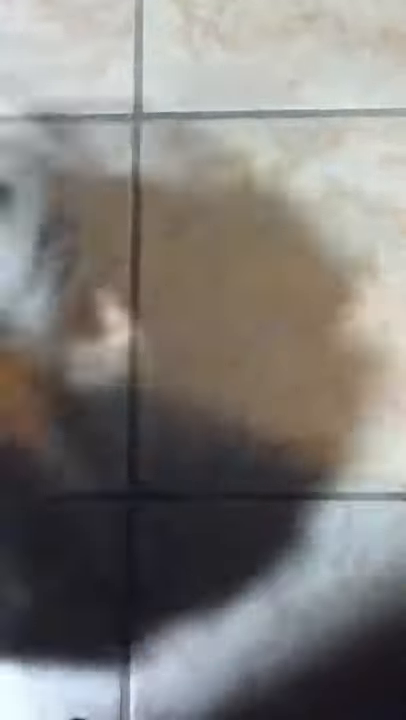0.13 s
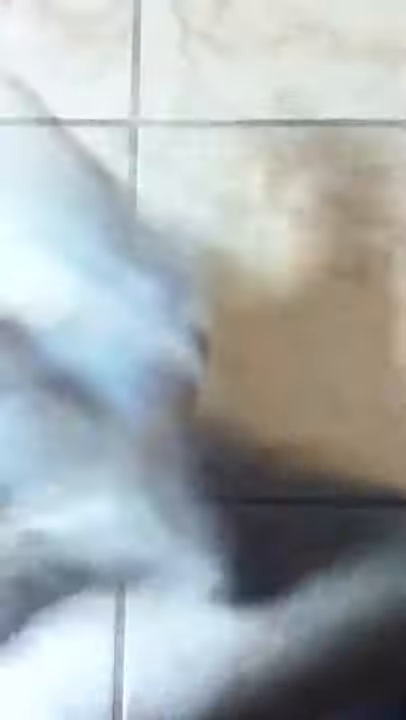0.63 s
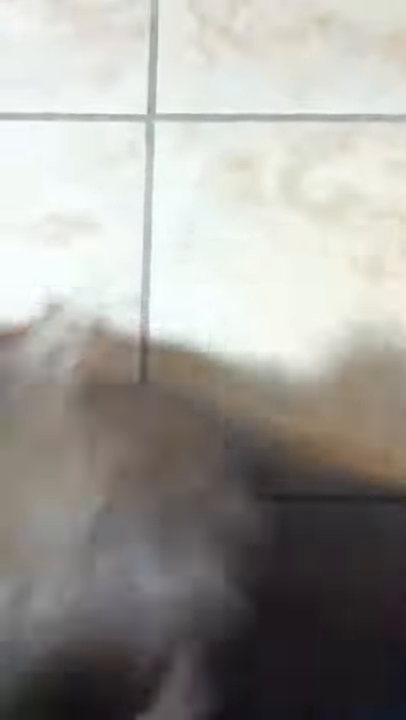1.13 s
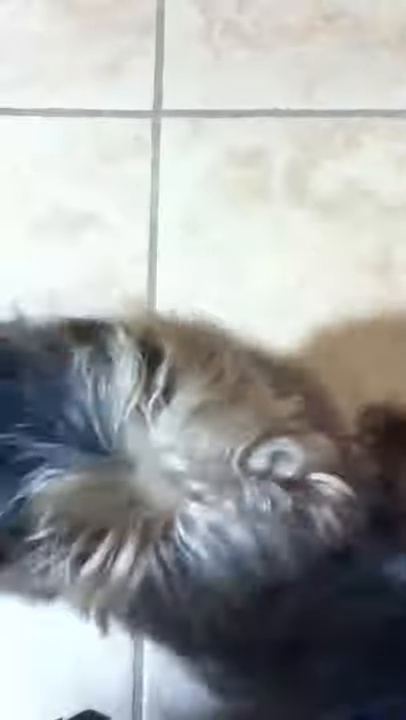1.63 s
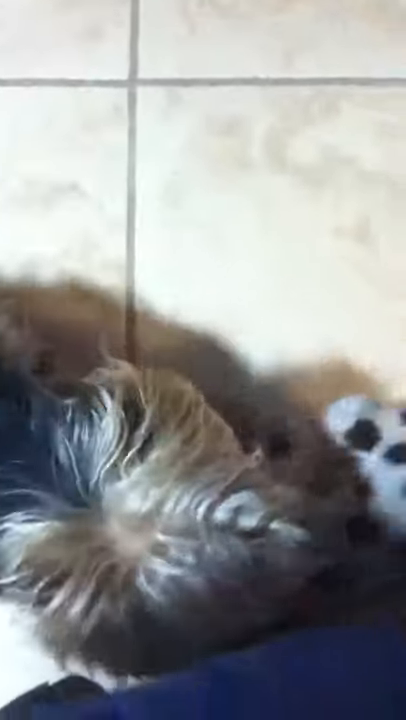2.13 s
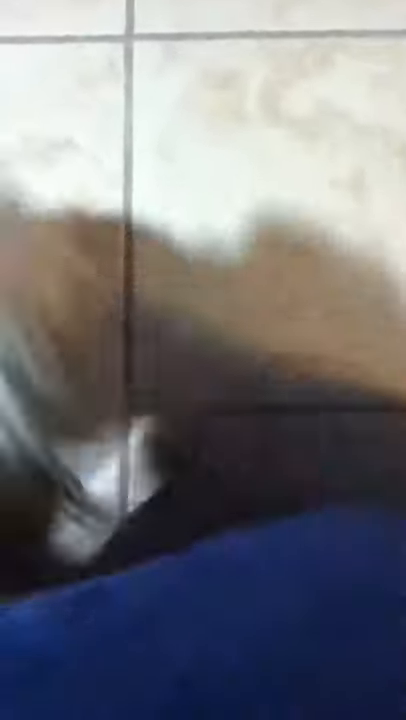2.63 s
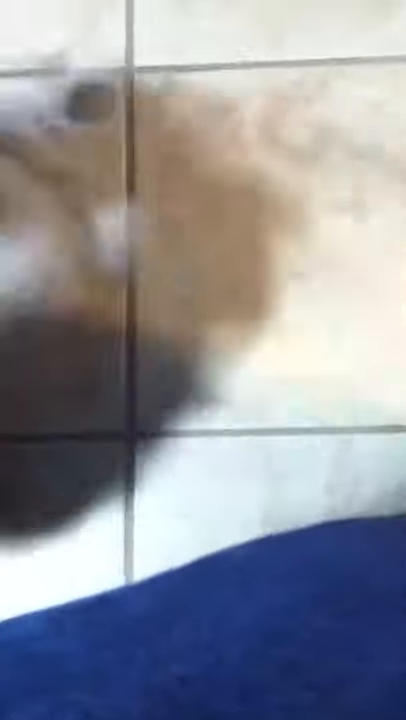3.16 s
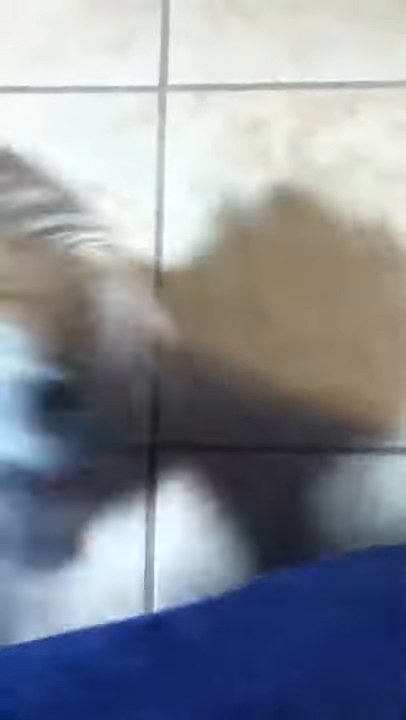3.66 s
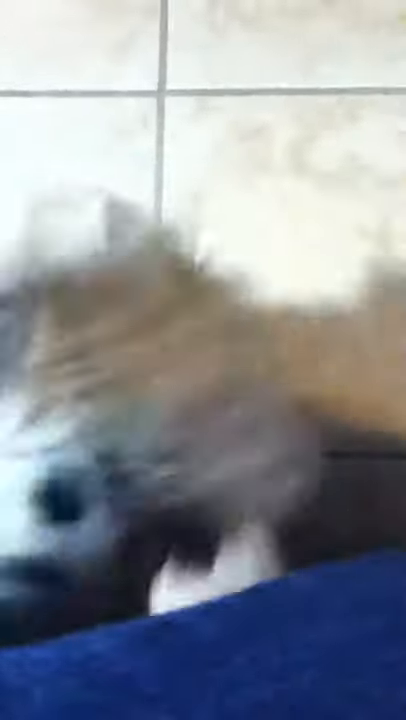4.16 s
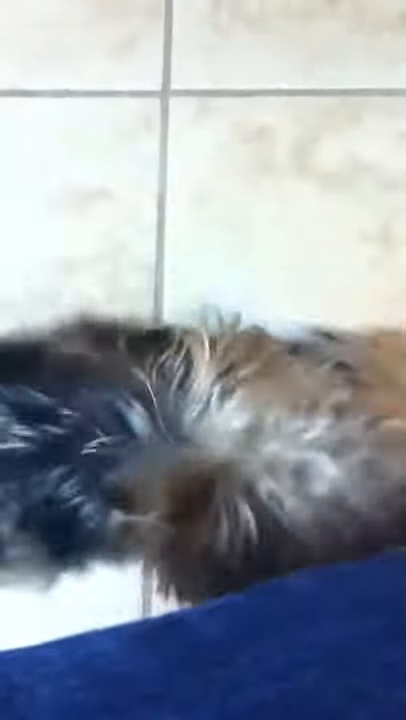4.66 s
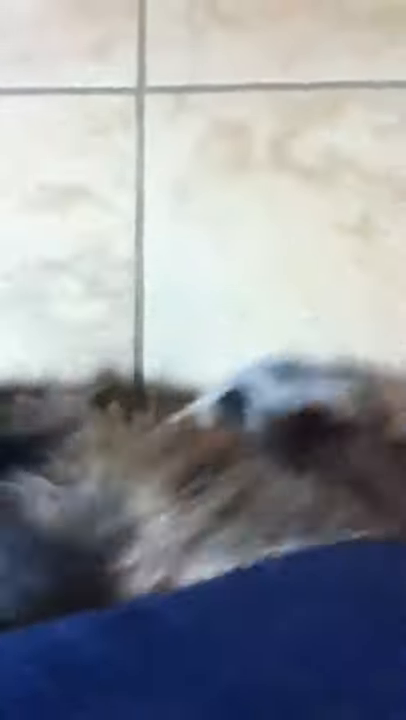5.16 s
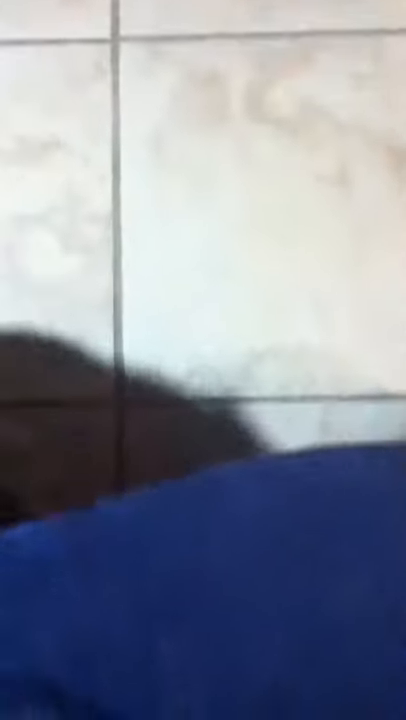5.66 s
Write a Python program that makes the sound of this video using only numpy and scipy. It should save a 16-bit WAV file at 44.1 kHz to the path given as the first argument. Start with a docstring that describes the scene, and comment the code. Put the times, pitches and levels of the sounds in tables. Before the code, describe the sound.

Close to a phone microphone in a hard, tiled room, a small dog growls roughly in play. Two loud raspy growls come first, the second with thin whistles, then a toy knocks and collar tags chink brightly. A low, quiet growl follows, then a longer one that starts low and swells. Claws and tags scatter over the tiles before three final growls, the last two softer. A faint household hum runs beneath.

```python
"""A small dog play-growls over a toy on a tiled floor, close to a phone, in a hard room with a household hum.
A faint tag chink and claw ticks lead into two rough growls, with thin whistles in the second; the toy knocks,
tags chink, and two growls that start low follow. Claws and tags fill the gap before three last growls.
Growls are irregular slaps through moving resonances, with breath noise gated by the slaps; tags and toy are
decaying partials, claws are noise bursts; the room is decaying noise and the hum is coloured noise."""
import sys
import numpy as np
from scipy import signal
from scipy.fft import rfft, irfft, next_fast_len
from scipy.io import wavfile
from scipy.ndimage import uniform_filter1d, map_coordinates

SR = 44100
rng = np.random.default_rng(int(sys.argv[2]) if len(sys.argv) > 2 else 0)


def convert_level_to_amplitude(level_db):
    """Map a level in decibels to its linear amplitude factor."""
    exponent = np.asarray(level_db, float) / 20
    return 10 ** exponent


def to_wav(s):
    """Save 16-bit WAV."""
    ch = np.atleast_2d(s).T  # columns
    pcm = np.round(np.clip(ch, -1, 1) * 32767)  # PCM
    wavfile.write(sys.argv[1], SR, pcm.astype(np.int16))


N = 255339

# Colour of hard things scraping, for claws and metal. Each row: frequency in Hz, relative level in dB.
SCRAPE_COLOUR = [(2500, -22), (4500, -5.5), (9000, -2), (13000, -7), (15000, -15), (15900, -70)]


def unit(x):
    """Scales a signal to rms 1."""
    return x / np.sqrt(np.mean(x ** 2) + 1e-20)


def along(points, hz):
    """Interpolates (Hz, value) points on a log frequency axis."""
    f, v = np.transpose(points)
    return np.interp(np.log(hz + 1), np.log(f + 1), v)


def filtered(x, response):
    """Passes x through a fixed complex response of frequency."""
    m = next_fast_len(len(x) + 8192)
    return irfft(rfft(x, m) * response(np.fft.rfftfreq(m, 1 / SR)), m)[:len(x)]


def resonances(modes, sign=-1):
    """Causal response of (Hz, width, dB) modes; sign 1 starts all together and leaves dark valleys."""
    def response(f):
        total = 0
        for k, (centre, width, db) in enumerate(modes):
            damping = 1j * f * width
            total = total + sign ** k * convert_level_to_amplitude(db) * damping / (centre * centre - f * f + damping)
        return total
    return response


def moving(x, response, size=512):
    """Passes x through a response of (frequency, sample position) that changes from frame to frame."""
    starts = np.arange(0, len(x) + size, size // 2)
    padded = np.pad(x, (size // 2, 2 * size))
    frames = padded[starts[:, None] + np.arange(size)] * signal.get_window("hann", size)
    hz = np.fft.rfftfreq(4 * size, 1 / SR)
    shapes = response(hz, np.minimum(starts, len(x) - 1)[:, None])
    out = irfft(rfft(frames, 4 * size) * shapes)
    at = starts[:, None] + np.arange(4 * size)
    return np.bincount(at.ravel(), out.ravel())[size // 2:][:len(x)]


def coloured(size, spectrum):
    """Noise of rms 1 with a (Hz, dB) spectrum."""
    return unit(filtered(rng.standard_normal(size), lambda hz: convert_level_to_amplitude(along(spectrum, hz))))


def wobble(size, rate):
    """A smooth random curve with rate knots a second."""
    knots = rng.standard_normal(int(size * 4 * rate / SR) + 9)
    return map_coordinates(knots, [np.arange(size) * rate / SR])


def impulses(size, at, sizes):
    """Band-limited impulses at fractional sample positions."""
    taps = np.floor(at)[:, None] + np.arange(-7, 9)
    offset = taps - at[:, None]
    shape = np.sinc(offset) * np.cos(np.pi * offset / 18) ** 2
    where = np.clip(taps, 0, size - 1).astype(int)
    return np.bincount(where.ravel(), (shape * sizes[:, None]).ravel(), size)


def steady(x, span):
    """Evens out the slow level of x over a span in seconds."""
    return x / np.sqrt(np.abs(uniform_filter1d(x ** 2, round(span * SR))) + 1e-12)


def dog():
    """Sets all the growls in place; each is one bout of fold slaps through a moving mouth."""
    # The folds, one table a bout. Each row: time in seconds, fold rate in Hz, chest level in dB.
    growls = [
        [(.284, 151.9, -53), (.318, 194.7, -40), (.34, 218.7, -29.5), (.39, 202, -37), (.428, 208.3, -32),
         (.464, 187, -48.5)],
        [(.566, 218.8, -38.5), (.585, 225, -31), (.632, 189.7, -33.5), (.69, 202.1, -29), (.76, 222.8, -31.5),
         (.82, 191.3, -39.5), (.856, 234.3, -42.5), (.9, 189.5, -38), (.94, 216, -40.5), (.974, 195, -32),
         (.995, 179.2, -51)],
        [(1.69, 125.4, -50), (1.738, 127.4, -45.5), (1.83, 131.2, -45), (1.88, 139.2, -45),
         (1.94, 142.6, -46.5), (1.98, 135.7, -43.5), (2.09, 137.6, -45.5), (2.148, 144.4, -42.5),
         (2.202, 114.4, -53.5)],
        [(2.5, 116.1, -52.5), (2.56, 122.9, -46.5), (2.602, 125.2, -40), (2.63, 148.8, -45),
         (2.664, 189.6, -30), (2.72, 197.9, -33.5), (2.76, 194.4, -36), (2.806, 220.5, -30),
         (2.874, 189.6, -34), (2.956, 213.5, -30), (3.006, 193.1, -37), (3.058, 222.6, -32.5),
         (3.124, 184.8, -41)],
        [(3.884, 114.2, -44), (3.94, 136.4, -45.5), (3.98, 133.3, -44), (4.028, 152.2, -45.5),
         (4.06, 203.1, -33), (4.134, 194.5, -32.5), (4.182, 178.8, -36), (4.222, 173.8, -47.5),
         (4.256, 199.4, -40), (4.29, 196.7, -37), (4.318, 186.8, -43.5), (4.382, 153.9, -41)],
        [(4.776, 128, -50), (4.814, 137.5, -44), (4.866, 149.3, -42.5), (4.91, 137.9, -47), (5.0, 135.9, -45),
         (5.05, 126, -45), (5.12, 142, -44), (5.148, 156.5, -40), (5.184, 237.7, -45.5), (5.242, 212.8, -43.5),
         (5.3, 195.6, -70)],
        [(5.574, 104.1, -50.5), (5.59, 105.1, -57), (5.612, 113.4, -43), (5.658, 123.6, -45.5),
         (5.718, 141, -48), (5.79, 145, -50)],
    ]
    # What leaves the mouth, one table a bout. Each row: time in seconds, rasp level in dB,
    # low resonance in Hz, share of the middle band in dB, share of the high band in dB.
    rasps = [
        [(0.284, -43.5, 950, -2, -6.5), (0.294, -35, 940, -2.5, -5.5), (0.332, -30, 930, -4, -4.5),
         (0.384, -34.5, 980, -3.5, -6), (0.414, -29.5, 1000, -1, -1.5), (0.438, -37, 1000, -7, -8),
         (0.458, -45, 990, -22, -15), (0.464, -46, 1010, -2, 2)],
        [(0.566, -35.5, 1080, -17, -24), (0.58, -34.5, 1080, -4.5, -11), (0.602, -40.5, 1050, -7, -17),
         (0.628, -38.5, 940, 0.5, -8), (0.672, -34, 1090, 0, -7), (0.71, -35.5, 950, -2.5, -9),
         (0.744, -28, 885, -1.5, -6.5), (0.81, -36.5, 940, -3.5, -14), (0.84, -44.5, 970, -23, -18),
         (0.87, -32, 1000, -10, -18), (0.896, -39, 1010, 0, -9.5), (0.956, -32.5, 1010, -3.5, -9),
         (0.995, -41, 1023, -3.5, -14.5)],
        [(1.7, -56, 1000, -16, -11), (1.776, -41, 1060, -3, -7.5), (1.836, -45, 1060, -4, -5.5),
         (1.85, -43.5, 1060, -6.5, -9), (2.026, -44, 1090, -1, -8.5), (2.034, -46, 1070, -7, -4),
         (2.066, -41.5, 1010, -2, -5), (2.074, -47, 1008, 2, -0.5), (2.108, -40.5, 1000, 0, -9),
         (2.122, -50, 1030, 2, 0), (2.146, -43, 1060, -4.5, -12.5), (2.2, -53, 967, -5, 0)],
        [(2.535, -70, 1010, -16, -24), (2.553, -41, 1010, -15, 0), (2.593, -40.5, 1010, -0.5, 1),
         (2.701, -33, 820, -2.5, -8.5), (2.779, -33.5, 885, -5, -8), (2.817, -37, 874, -11, -28),
         (2.917, -39, 880, -2.5, -7.5), (2.959, -31.5, 889.5, 0, -1), (3.011, -38, 949, -9, -18),
         (3.061, -28.5, 986, -4.5, -5.5), (3.124, -47.5, 920, -2, -15)],
        [(3.88, -47, 986, -9, -25), (3.954, -41, 1040, -3, -6), (3.982, -50, 1010, -1, -8),
         (3.99, -39.5, 1020, -4, -2), (4.066, -36.5, 950, 1.5, 0), (4.144, -37.5, 1000, -1.5, 2),
         (4.224, -46.5, 870, -7, -9), (4.28, -49, 940, -16, -17), (4.298, -41, 923, -16, -21),
         (4.304, -56, 910, -10, -12), (4.33, -48.5, 900, -10, -5), (4.37, -46.5, 980, -7, -9),
         (4.39, -45, 1030, -7, -8.5)],
        [(4.78, -51.5, 765, -9, -12), (4.822, -42, 774, -7.5, -12.5), (4.91, -40.5, 836, -7.5, -7),
         (4.936, -43.5, 840, -6, -14), (4.954, -47, 825, -14, -14), (5.02, -42.5, 790, -9, -11),
         (5.03, -47, 834, -10, -15), (5.058, -38, 870, -7, -11), (5.078, -44.5, 910, -7, -10),
         (5.088, -40, 820, -8.5, -8.5), (5.184, -46.5, 765, -7, -14), (5.258, -52, 840, -15, -6),
         (5.3, -59, 848, -7, 1)],
        [(5.59, -55, 830, -11, -23), (5.612, -48, 820, -7, -15), (5.628, -41.5, 840, -11, -11),
         (5.668, -44, 840, -10, -14), (5.68, -44, 820, -9, -16.5), (5.79, -42, 840, -8.5, -13.5)],
    ]
    # Unevenness, one row a bout: roughness from 0 to 1, flutter rate in Hz, time of a flutter trough
    # in seconds, flutter depth in dB when the folds are fully slack.
    roughs = [(.85, 24, .3, 2.5), (.85, 24, .6, 2.5), (.45, 23.8, 1.875, 2.6), (.65, 25, 2.6, 2),
              (.8, 25, 3.94, 2.6), (.5, 27, 4.95, 1.2), (.4, 25.6, 5.68, 1)]
    # Mean breath level of each bout in dB.
    breath_levels = [-52.5, -52.5, -68.5, -52.5, -61, -60, -61]
    # Moving resonances, one row a bout: usual low, middle and high levels in dB, top of the voice in Hz.
    jaws = [((-0.67, 0, -2), 2700), ((-0.21, 0, -4), 2500), ((-11.5, 0, -7.5), 2690), ((0, -1.5, -11),
            3090), ((1, 0, -9.5), 3200), ((0, -3.1, -3.5), 2980), ((0, -10, -10.5), 2980)]
    # Their widths, one row a bout: low, middle and high in Hz.
    jaw_widths = [(200, 260, 380), (180, 200, 340), (450, 115, 300), (190, 190, 320), (220, 180, 320),
                  (170, 140, 300), (170, 150, 300)]
    # Resonances of near-steady pitch, one table a bout. Each row: centre in Hz, width in Hz, usual level in dB.
    throats = [
        [(1210, 160, -19), (5050, 370, 2)],
        [(1160, 130, -17.5), (5150, 430, 6.5)],
        [(1300, 180, -11), (3400, 166, 4.5), (3930, 190, 5)],
        [(1230, 48, -14), (4380, 84, -11), (4700, 390, -15)],
        [(1190, 84, -9), (4150, 96, -6), (4650, 330, -15)],
        [(606, 120, -11.5), (2950, 45, -4), (3620, 330, -1), (4380, 400, -11)],
        [(524, 38, 1.5), (3530, 83, 2), (4580, 940, -1)],
    ]
    out = np.zeros(N + SR)
    for shape in zip(growls, rasps, roughs, breath_levels, jaws, jaw_widths, throats):
        voice, start = bout(*shape)
        out[round(start * SR):][:len(voice)] += voice
    return out[:N]


def bout(folds, rasp, rough, mean_breath_db, jaw, widths, still):
    """One growl: slaps boom in the chest, crack through the moving mouth and gate the breath noise."""
    s, *fold_tracks = np.transpose(folds)
    t = np.arange(s[0] - .07, s[-1] + .1, 1 / SR)
    n = len(t)
    pitch, chest_db = (np.interp(t, s, track) for track in fold_tracks)
    rasp_s, *rasp_tracks = np.transpose(rasp)
    throat_db, low_hz, middle_db, high_db = (np.interp(t, rasp_s, track) for track in rasp_tracks)
    # breath moves .45 dB per dB of voice, with 1.5 dB gusts of its own
    breath_db = mean_breath_db + .45 * (throat_db - np.median(throat_db)) + 1.5 * wobble(n, 21.1)

    even, slaps = fold_slaps(t, pitch, rough)
    # air leaks after each slap
    puffs = unit(np.abs(filtered(slaps, lambda f: 1 / (1 + 1j * f / 90) ** 2)))
    modes = mouth_modes(t, low_hz, middle_db, high_db, rough[0], jaw[0], widths, still)
    hollow = min(hz for hz, width, db in still) > 960  # Hz; no throat resonance lies in the nasal band
    throat = throat_rasp(slaps, puffs, modes, rough[0], jaw[1], hollow)

    before, after = np.maximum(s[0] - t, 0), np.maximum(t - s[-1], 0)

    def ends_db(rise_s, fall_s):
        """Fades by 30 dB in each of these times outside the bout."""
        return -30 * (before / rise_s + after / fall_s)

    mix = convert_level_to_amplitude(throat_db + ends_db(.026, .013)) * throat
    mix = mix - convert_level_to_amplitude(caught(t, chest_db) + ends_db(.059, .059)) * chest_boom(even)
    mix = mix + convert_level_to_amplitude(breath_db + ends_db(.045, .1)) * breath_hiss(puffs)
    edge = np.clip(np.minimum(t - t[0], t[-1] - t) / .012, 0, 1)
    return edge * mix, t[0]


def fold_slaps(t, pitch, rough):
    """Vocal folds slap once a cycle: an even train for the chest and an irregular one for the mouth."""
    # Single slaps given a level of their own. Each row: time in seconds, dB over the usual slap.
    cracks = [(0.294, 2.5), (.308, 4), (.336, 6.5), (0.411, -0.5), (.618, 6), (.739, 0), (1.884, 4),
              (2.9515, 3), (2.9613, 6), (3.0378, 6), (3.0593, 5.5), (3.072, 5), (3.993, 2), (4.032, 4.5),
              (4.289, -3), (4.809, 2), (5.042, 4), (5.612, 8)]
    roughness, flutter_hz, trough, flutter_db = rough
    n = len(t)
    # slack folds at low pitch beat against loose tissue
    slack = np.clip((175 - pitch) / 30, .25, 1)
    flutter = -slack * np.cos(2 * np.pi * flutter_hz * (t - trough) + .3 * wobble(n, 8))
    calm = 1 - .4 * slack  # slack folds lose part of the roughness
    rate = pitch * (1 + .025 * flutter + .04 * roughness * calm * wobble(n, 40))
    cycles = np.cumsum(rate) / SR
    at = np.interp(np.arange(1, cycles[-1]), cycles, np.arange(n))
    k = at.astype(int)
    period = SR / pitch[k]  # samples
    chance = np.clip(rng.standard_normal((len(at), 6)), -2, 2)

    even_at = at + (.035 + .025 * slack[k]) * chance[:, 3] * period
    even = impulses(n, even_at, convert_level_to_amplitude(flutter_db * flutter[k] + 2.0 * chance[:, 0]))

    scatter_db = .8 + 2.2 * roughness
    size = convert_level_to_amplitude(flutter_db * flutter[k] + scatter_db * chance[:, 1])
    uneven = at + .05 * roughness * calm[k] * chance[:, 2] * period
    for moment, db in cracks:
        if t[0] < moment < t[-1]:
            position = (moment - t[0]) * SR
            nearest = np.argmin(np.abs(at - position))
            uneven[nearest], size[nearest] = position, convert_level_to_amplitude(db)
    slaps = impulses(n, uneven, size)

    # some slaps rebound .45 of a cycle later, 3 dB weaker; at full roughness .22 of them do
    rebounds = chance[:, 4] > np.quantile(chance[:, 4], 1 - .22 * roughness)
    slaps = slaps + impulses(n, at + .45 * period, rebounds * size * convert_level_to_amplitude(-3))

    # each slap is a little brighter or duller above 900 Hz
    tint = convert_level_to_amplitude(3 * chance[:, 5])
    brighter = impulses(n, uneven, size * (tint - 1))
    return even, slaps + filtered(brighter, lambda f: (1j * f / 900 / (1 + 1j * f / 900)) ** 2)


def mouth_modes(t, low_hz, middle_db, high_db, roughness, levels, widths, still):
    """Jaws and tongue move three resonances; with roughness all waver as the tongue stirs."""
    # Jaws and tongue at work on the toy. Each row: time in seconds, middle resonance in Hz, high one in Hz.
    mouth = [(.27, 1810, 2950), (.45, 1690, 2690), (.56, 1680, 2740), (.65, 1780, 2700), (.74, 1600, 2950),
             (.8, 1450, 2930), (.86, 1510, 2850), (.93, 1880, 2760), (1.02, 1652, 2760), (1.68, 1770, 2330),
             (1.76, 1915, 2350), (2.2, 1860, 2580), (2.54, 2180, 3730), (2.59, 2060, 3440),
             (2.64, 1700, 2950), (2.71, 1670, 2940), (2.85, 1450, 3240), (2.96, 1570, 2950),
             (3.06, 1550, 3400), (3.16, 1580, 3400), (3.87, 1758, 3160), (4.0, 1880, 3400),
             (4.1, 1790, 2770), (4.2, 1660, 2950), (4.29, 1300, 2950), (4.33, 1890, 3200),
             (4.37, 2010, 3300), (4.42, 2454, 3300), (4.78, 1390, 2380), (4.86, 1350, 1980),
             (4.95, 1430, 1580), (5.0, 1260, 2040), (5.2, 1360, 2270), (5.3, 1300, 2900),
             (5.58, 1400, 2300), (5.79, 1500, 1730)]
    wander, flicker_db, chews_per_s = .045, 5, 30  # share of pitch and dB, both at full roughness
    n = len(t)
    when, *tracks = np.transpose(mouth)
    middle_hz, high_hz = (np.interp(t, when, hz) for hz in tracks)
    # a resonance gains 1.58 dB per dB of its band's share
    middle_db, high_db = (1.58 * np.clip(db - np.median(db), -9, 7) for db in (middle_db, high_db))
    levels = [levels[0], levels[1] + middle_db, levels[2] + high_db]
    modes = [*zip([low_hz, middle_hz, high_hz], widths, levels)]
    # throat resonances above 1700 Hz brighten and dull with the high one
    modes += [(hz, width, db + high_db * (hz > 1700)) for hz, width, db in still]
    wavering = []
    for hz, width, db in modes:
        centre = np.broadcast_to(hz, n) * (1 + roughness * wander * wobble(n, chews_per_s))
        wavering.append((centre, width, db + roughness * flicker_db * wobble(n, chews_per_s)))
    return wavering


def throat_rasp(slaps, puffs, modes, roughness, top_hz, hollow):
    """Slaps and leaking air crack through the nose and the moving mouth resonances."""
    # (Hz, width Hz, dB): the bare slap heard past the resonances, then the nose
    snap, nose = (1700, 4800, -13), (380, 270, -16)
    share = .06 + .07 * roughness  # noise power
    noise = unit((puffs + 2.1) * rng.standard_normal(len(slaps)))
    source = np.sqrt(1 - share) * unit(slaps) + np.sqrt(share) * noise
    source = filtered(source, lambda f: (1 - (f / top_hz) ** 2 + 1.3j * f / top_hz) ** -3)
    if hollow:
        # the nasal passage swallows .6 of a band at 610 Hz, 260 Hz wide
        source = filtered(source, lambda f: 1 - .6 * resonances([(610, 260, 0)])(f))

    def tract(f, i):
        now = [(hz[i], width, db[i]) for hz, width, db in modes]
        return resonances([snap, nose] + now, sign=1)(f)

    return steady(moving(source, tract), span=.049)


def caught(t, chest_db):
    """The chest voice catches or surges for a moment: bell-shaped dips and rises of its level."""
    # Each row: time in seconds, chest level change in dB, below 0 a catch and above 0 a surge.
    catches = [(0.4, -27), (0.412, 7), (0.621, -21), (0.66, -18), (0.69, -8), (0.729, -7), (0.803, -7),
               (0.9, -13), (1.649, 16), (2.675, -15), (2.799, -18), (4.066, -8.5), (4.101, -30),
               (4.138, -8), (4.169, -11), (4.24, -15), (4.293, -28), (4.306, 11.5), (5.575, 7)]
    for moment, db in catches:
        half_s = .011 if db > 0 else .01
        chest_db = chest_db + db * np.exp(-((t - moment) / half_s) ** 2)
    return chest_db


def chest_boom(even):
    """Even slaps boom through the windpipe and the chest, two resonances in series."""
    # Windpipe, then chest. Each row: centre in Hz, width in Hz, level in dB.
    cavities = [(195, 98, 0), (213, 93, 0)]
    boomed = filtered(even, lambda f: resonances(cavities[:1])(f) * resonances(cavities[1:])(f))
    return steady(boomed, span=.048)


def breath_hiss(puffs):
    """Breath noise swells with each puff of leaking air; lips and fur tint it in patches."""
    # Each row: frequency in Hz, relative density in dB per Hz.
    hiss_colour = [(2060, -13), (3500, -3), (4860, -4), (5800, -14.5), (7000, -10.5), (9460, -14),
                   (12500, -32), (14100, -40), (15800, -52)]
    drift = wobble(len(puffs), 29.64)
    hiss = unit((puffs + .5) * coloured(len(puffs), hiss_colour))

    def tint(f, i):
        return convert_level_to_amplitude(3 * np.sin(f / 700 + 3 * drift[i]) + 3 * np.sin(f / 310 - 5 * drift[i]))

    return unit(moving(hiss, tint))


def squeaks():
    """Air whistles past the teeth: short tones of unsteady phase."""
    # Each row: time in seconds, half length in seconds, frequency in Hz, peak level in dB.
    whistles = [(.851, .013, 5850, -49), (.862, .02, 7190, -54), (.675, .008, 6700, -53)]
    t = np.arange(N) / SR
    out = np.zeros(N)
    for s, half, hz, db in whistles:
        tone = np.sin(2 * np.pi * hz * t + 1.4 * wobble(N, 150))
        out += convert_level_to_amplitude(db) * np.exp(-((t - s) / half) ** 2) * tone
    return out


def struck(hits, modes, trim_db, rattle, damped, crack_db):
    """Each hit cracks, then rings a small hard thing: decaying partials with shaken phase (radians)."""
    out, t = np.zeros(N + SR), np.arange(SR // 3) / SR
    for s, db, *tilt_db in hits:
        ring = 0
        for hz, level, t60 in modes:
            partial_db = level + sum(tilt_db) * np.log2(hz / 10000) + rng.normal(0, 2.3)
            phase = 2 * np.pi * hz * t + rattle * wobble(len(t), 210)
            ring = ring + convert_level_to_amplitude(partial_db - 60 * t / t60) * np.sin(phase)
        # part of the ring is damped at once
        ring = ring * (1 + damped * convert_level_to_amplitude(-60 * t / .0091))
        decay = convert_level_to_amplitude(-60 * t / .0047) + .06 * convert_level_to_amplitude(-60 * t / .22)
        crack = convert_level_to_amplitude(crack_db) * decay * coloured(len(t), SCRAPE_COLOUR)
        onset = 1 - np.exp(-t / .0011)
        out[round(s * SR):][:len(t)] += convert_level_to_amplitude(db + trim_db) * (ring + crack) * onset
    return out[:N]


def thin_tag():
    """A thin collar tag chinks: its ring is partly damped by fur and shaken a little by its neighbours."""
    # Each row: time in seconds, relative level in dB, tilt in dB per octave about 10 kHz.
    hits = [(0.055, -47.5, -13.5), (0.066, -51, -5), (1.37, -25, 3), (1.3802, -23, 2)]
    # Each row: partial in Hz, relative level in dB, t60 in seconds.
    partials = [(4300, -24, .05), (4540, -25, .08), (4610, -24, .12), (7000, -11, .13), (7620, -24, .04),
                (10130, -5, .1), (10190, 2, .15), (9300, -24, .12), (12920, -13, .09), (15470, -11, .1),
                (15720, -15, .09)]
    return struck(hits, partials, trim_db=-6.5, rattle=.5, damped=.25, crack_db=0)


def ring_tag():
    """A second collar tag chinks: fur damps more of its ring and its neighbours shake it harder."""
    # Each row: time in seconds, relative level in dB, tilt in dB per octave about 10 kHz.
    hits = [(0.4658, -42, 0), (0.7756, -35.5, -2), (0.9672, -36.5, -13), (3.125, -49, 15), (3.1453, -44, 0),
            (3.1662, -34, 20), (3.1822, -34.5, -8), (3.4974, -45, -20), (3.5134, -35.5, -25),
            (3.5703, -35, -17), (3.58, -29.5, 33), (3.599, -44, 20), (3.6242, -43.5, -17),
            (3.8751, -37.5, 0), (3.9604, -39.5, 0)]
    # Each row: partial in Hz, relative level in dB, t60 in seconds.
    partials = [(9330, 1.5, 0.15), (9190, 4, 0.018), (10780, -3, 0.23), (11200, -3, 0.055)]
    return struck(hits, partials, trim_db=-14.5, rattle=2.2, damped=4.6, crack_db=17.5)


def toy():
    """A hard part of the toy knocks on the tiles: low, quickly dying partials."""
    # Each row: time in seconds, relative level in dB.
    hits = [(1.1177, -48.5), (1.1235, -45), (1.198, -55), (3.679, -68)]
    # Each row: partial in Hz, relative level in dB, t60 in seconds.
    partials = [(324, 7.5, 0.026), (1104, 3.5, 0.037), (1458, 4, 0.062), (1810, 4, 0.04), (2200, -1, 0.043)]
    return struck(hits, partials, trim_db=-3, rattle=1, damped=.33, crack_db=-14)


def claws():
    """Each contact on tile is a spiky tick and a softer scrape, over the duller knock of the pad."""
    # Each row: time in seconds, relative claw level in dB, relative knock level in dB, scrape t60 in seconds.
    contacts = [(0.225, -39.5, -64, 0.048), (0.468, -31, -44.5, 0.028), (0.49, -27.5, -42.5, 0.048),
                (0.8636, -24.5, -34, 0.12), (1.009, -26.5, -62, 0.044), (1.1159, -43, -49.5, 0.12),
                (1.1591, -24, -79, 0.045), (1.3003, -41, -70, 0.042), (1.6021, -39.5, -55, 0.064),
                (1.723, -41.5, -61, 0.074), (2.3376, -44, -73, 0.044), (2.3955, -44, -68, 0.12),
                (2.9888, -18, -38, 0.058), (3.1463, -22.5, -45.5, 0.054), (3.2693, -34, -56, 0.049),
                (3.318, -30.5, -73, 0.06), (3.411, -44, -71, 0.055), (3.453, -35.5, -62, 0.071),
                (3.493, -32.5, -56, 0.061), (3.584, -35, -44.5, 0.023), (3.6775, -42, -47, 0.088),
                (3.743, -42, -81, 0.091), (3.87, -33.5, -51, 0.1), (3.9632, -42, -39, 0.079),
                (4.369, -45, -46.5, 0.12), (4.6143, -37.5, -71, 0.053), (4.661, -47, -83, 0.084),
                (5.4925, -43.5, -74, 0.062)]
    # The paw's knock. Each row: centre in Hz, width in Hz, relative level in dB.
    tile = [(487, 1900, 0), (1450, 760, 4), (2300, 420, 3), (3980, 2300, -7.5)]
    scrape, knock, t = np.zeros(N + SR), np.zeros(N + SR), np.arange(SR // 4) / SR
    for s, db, knock_db, t60 in contacts:
        # a sliding claw skips over the glaze
        stutter_db = 4 * wobble(len(t), 254)
        drag = (1 - np.exp(-t / .01)) * convert_level_to_amplitude(-60 * t / max(t60, .005) + stutter_db)
        # longer slides tick less
        tick = .059 / max(t60, .03) * convert_level_to_amplitude(-60 * t / .004)
        tick_noise, drag_noise, knock_noise = rng.standard_normal((3, len(t)))
        start = round(s * SR)
        scrape[start:][:len(t)] += convert_level_to_amplitude(db) * (.3 * tick * tick_noise + .5 * drag * drag_noise)
        knock[start:][:len(t)] += convert_level_to_amplitude(knock_db + 13.5) * (2.4 * tick + .5 * drag) * knock_noise
    scrape = filtered(scrape, lambda hz: convert_level_to_amplitude(along(SCRAPE_COLOUR, hz)))
    return (scrape + filtered(knock, resonances(tile)))[:N]


def room(x, size=8192):
    """A fresh noise tail for each overlapping piece of sound, each frequency dying at its own speed."""
    # Decay of the hard room. Each row: frequency in Hz, t60 in seconds.
    decay = [(200, 0.23), (2000, 0.24), (10000, 0.023)]
    out = np.zeros(N + SR)
    for start in range(-size // 2, N, size // 2):
        hz, t, z = signal.stft(rng.standard_normal(SR // 3), SR, nperseg=256)
        fading = z * convert_level_to_amplitude(-60 * t / along(decay, hz)[:, None])
        tail = signal.istft(fading, SR, nperseg=256)[1]
        piece = np.pad(x, size)[start + size:][:size] * signal.get_window("hann", size)
        wet = signal.fftconvolve(piece, tail / np.linalg.norm(tail))[max(-start, 0):]
        out[max(start, 0) + 130:][:len(wet)] += wet  # 130 samples late
    return out[:N]


def hum():
    """Household hum: broad noise of gently wavering level, with narrow noise bands as appliance drones."""
    # Broad hum. Each row: frequency in Hz, relative density in dB per Hz.
    hum_colour = [(53, -19), (90, -15.5), (259, -3), (616, -13.5), (716, -16), (909, -9.5), (1100, -16.5),
                  (1230, -16.5), (1630, -17), (1850, -16), (4700, -30.5), (8060, -33.5), (10400, -32.5),
                  (15800, -52)]
    # Appliance drones. Each row: centre in Hz, width of each of two passes in Hz, rms level in dB.
    drones = [(240.1, 8.3, -67.5), (906.5, 33, -70)]
    out = convert_level_to_amplitude(-58 + .77 * wobble(N, 1.66)) * coloured(N, hum_colour)
    for hz, width, db in drones:
        band = resonances([(hz, width, 0)])
        out = out + convert_level_to_amplitude(db) * unit(filtered(rng.standard_normal(N), lambda f: band(f) ** 2))
    return out


def scene():
    """Dog, tags, toy and claws in the room, over the hum."""
    hard = thin_tag() + ring_tag() + claws() + toy()
    voice = dog() + squeaks()
    wet = room(convert_level_to_amplitude(-13) * voice + convert_level_to_amplitude(-7) * hard)
    return (voice + hard + wet + hum())[None]


def band_limit(x):
    """A steep low-pass at the top of the band."""
    return signal.sosfilt(signal.butter(12, 15900, fs=SR, output="sos"), x)


def record(dry):
    """The phone microphone cuts deep bass steeply, leaving a rumble that swells with loud sound."""
    x = filtered(dry[0], lambda f: (1 - (115 / (f + 1)) ** 2 - 1.1j * 115 / (f + 1)) ** -2)
    loudness = np.sqrt(np.abs(uniform_filter1d(x ** 2, 1500)))
    rumble = coloured(N, [(10, -1), (40, 6), (90, 4), (200, -31)])
    x = x + (convert_level_to_amplitude(-90) + convert_level_to_amplitude(-46.5) * loudness) * rumble
    return band_limit(x[None])


dry = scene()
out = record(dry)
to_wav(out)
```